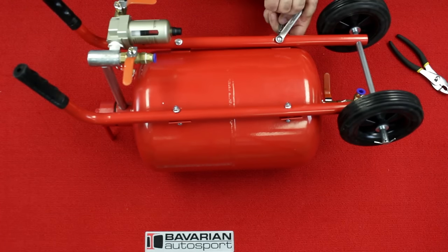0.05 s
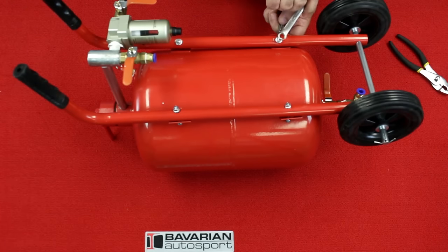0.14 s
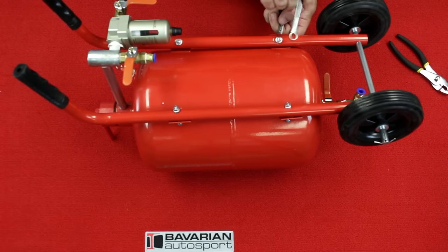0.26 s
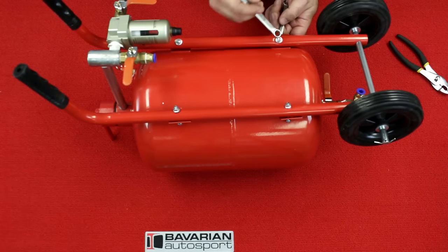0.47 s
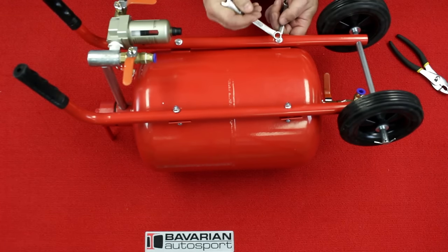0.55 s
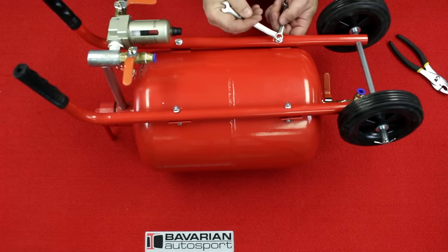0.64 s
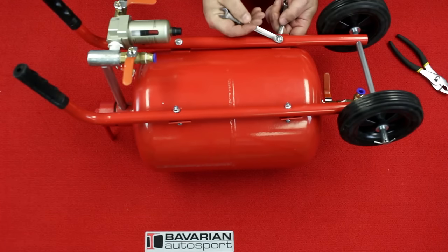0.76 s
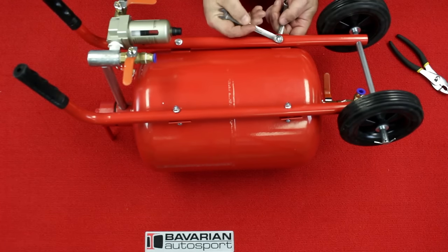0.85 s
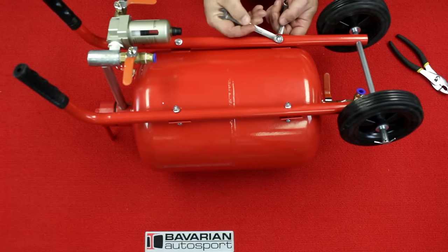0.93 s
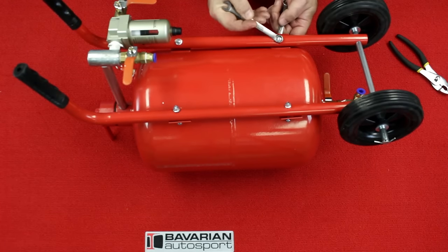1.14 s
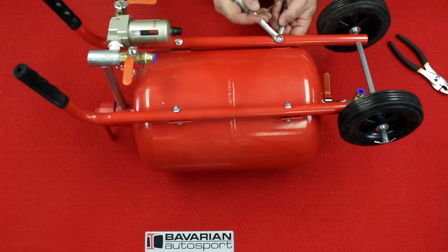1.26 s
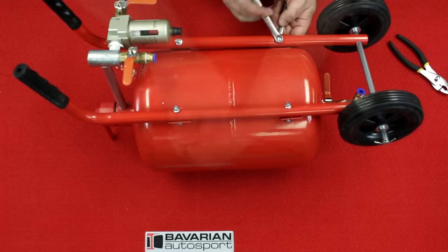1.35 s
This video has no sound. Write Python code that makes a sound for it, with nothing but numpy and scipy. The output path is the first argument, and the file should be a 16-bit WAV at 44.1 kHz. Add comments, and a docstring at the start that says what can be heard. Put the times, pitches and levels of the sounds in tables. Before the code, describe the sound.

Steel wrenches clink and clank against a nut and bolt on a metal frame.

```python
"""Two steel wrenches knock on a nut and bolt of a tubular steel frame that carries a small tank.
Each knock rings the frame (clank near 1 kHz, low tank hum) and the hand-damped wrenches (bright clink).
The jaws rub faintly between knocks; a hand bumps the frame once.
A small workshop adds a short tail, air noise and rumble."""
import sys
import numpy as np
from scipy import signal
from scipy.fft import rfft, irfft
from scipy.io import wavfile
from scipy.ndimage import uniform_filter1d

SR = 44100
rng = np.random.default_rng(int(sys.argv[2]) if len(sys.argv) > 2 else 0)


def wav_out(sig):
    """Save sig, one row per channel (or a flat mono array), as 16-bit PCM at SR to the path in sys.argv[1]."""
    wavfile.write(sys.argv[1], SR, np.round(np.clip(np.atleast_2d(sig).T, -1, 1) * 32767).astype(np.int16))


N = 61739
T = np.arange(N) / SR
BINS_HZ = np.maximum(np.arange(N // 2 + 1) * SR / N, 1)

# noise spectra: f/Hz, relative level/dB
AIR_COLOUR = [(41, -13.5), (70, -7.5), (166, -7.5), (199, -11), (451, -17), (606, -19), (1050, -20.5),
              (1470, -27), (2170, -29), (2540, -31.5), (2980, -31.5), (4480, -37.5), (16000, -41.5)]
RUMBLE_COLOUR = [(8, 2.5), (20, 1), (28, 2), (40, 0), (58, -9), (80, -20.5), (160, -59.5)]
RUB_COLOUR = [(300, -1), (1500, -9), (4000, -2.5), (7500, -4), (11000, -13.5), (16000, -11)]
BUMP_COLOUR = [(60, -25), (160, 5.5), (290, 5.5), (450, -7), (1500, -16), (6000, -29), (16000, -36)]
# rumble envelope: t/s, level/dB
RUMBLE_LEVELS = [(0.0, -66), (0.15, -53), (0.368, -60), (0.4, -52.5), (0.618, -67), (1.062, -58),
                 (1.242, -63), (1.308, -60), (1.4, -49)]
# knocks: t/s, frame level/dB, frame tilt/(dB/oct), favoured f/Hz, favour/dB,
# wrench level/dB, wrench tilt/(dB/oct), second wrench's share/(0-1), contact time/s
KNOCKS = [(0.1389, -50, -2.5, 860, 4.5, -70, 4, 0, 0.0024), (0.203, -51, 10, 930, 17, -70, 3, 0.2, 0.00094),
          (0.2064, -38, -0.5, 1557, 18.5, -44.5, -6.5, 0, 0.0013),
          (0.2166, -35.5, -1.5, 590, 5, -43.5, -1, 0.6, 0.0022),
          (0.2337, -24, 0.5, 966, 9.5, -39, 2, 0.3, 0.0011),
          (.2495, -32.5, 2.5, 1300, -4, -42, 0, 0.76, 0.0017),
          (0.2649, -70, 3, 990, 19, -50, -7.5, 0.8, .002), (.311, -50, 2, 904, 9.5, -83, -11, 0.4, .002),
          (0.7539, -46.5, 3.5, 1394, -14, -34, 1, 0, 0.0015),
          (0.773, -46, -4, 1410, 12, -43.5, -7.5, 0, 0.00023),
          (0.8073, -38.5, -6, 1733, 24, -31.5, 4.5, .06, 0.00073),
          (0.8172, -36, 4, 579, 17.5, -57, -6, 0.9, 0.0003),
          (0.8392, -38.5, 9.5, 1324, 7.5, -41.5, 0, 0.8, 0.00017),
          (0.8779, -52, -1.5, 1350, -4, -51, -5.5, 0.25, 0.00055),
          (0.8926, -25.5, -0.5, 1618, 10.5, -25.5, -0.5, 0.98, 0.0012),
          (0.927, -42, -2.5, 968, 22, -51, -8, 1, 0.0012),
          (0.959, -78, 10, 950, 7, -57, -3.5, 0.82, 0.0013),
          (1.0701, -45.5, -3.5, 1670, 7.5, -55, 2, 0.84, 0.00088),
          (1.086, -47.5, 2.5, 1345, 9, -57, -5.5, 0, 0.0015),
          (1.1484, -51, -3, 970, 7.5, -75, 2, 0.3, 0.00063),
          (1.211, -67, 1, 1350, 6, -60.5, -3, 0.97, 0.00091),
          (1.3168, -50.5, 0.5, 1010, 9, -69.5, 3, 0.23, 0.0017),
          (1.345, -72, -11, 1014, 23, -102, -6, .5, 0.0022)]
# spectra of dense, quickly damped modes: f/Hz, relative level/dB
FRAME_BODY = [(40, -74), (150, -31), (290, -22.5), (340, -4.5), (450, -16), (580, -3.5), (740, -13),
              (860, 3.5), (1000, 0.5), (1120, -12.5), (1320, 2.5), (1480, -8.5), (1630, -6), (1850, -13),
              (2600, -16), (5000, -40.5), (16000, -70)]
WRENCH_BODY = [(50, -45), (300, -14.5), (900, -0.5), (2000, -1.5), (3500, 5), (6500, 9), (9000, 4),
               (11500, -1.5), (14500, -15), (16000, -19)]
# clear modes of the frame (tank, then tubes) and each wrench: f/Hz
FRAME_HZ = [330, 345, 388, 431, 603, 858, 926, 973, 1004, 1265, 1330, 1394, 1558, 1645, 1906]
WRENCH1_HZ = [2132, 2328, 2493, 2852, 4480, 4646, 5006, 6237, 6400, 7386, 10410, 10800, 11400, 15100]
WRENCH2_HZ = [2455, 2720, 3200, 3284, 3803, 4721, 5864, 6158, 6627, 7090, 8420, 10600, 12100, 13250]
# the same modes: relative level/dB, t60/s before the MAX_Q cap
TANK_MODES = [(-29, .9), (-27.5, 1.3), (-28, 1.1), (-21.5, .55)]
TUBE_MODES = [(-17, 0.153), (-4, 0.17), (-17, 0.066), (-4, 0.14), (-13.5, 0.19), (-10, 0.17), (-10.5, 0.24),
              (-11.5, 0.33), (-9.5, 0.21), (-4.5, 0.049), (-16.5, .22)]
WRENCH1_MODES = [(-5, 0.16), (-1.5, 0.088), (4.5, 0.089), (-10, 0.24), (-1.5, 0.1), (-12, 0.11),
                 (-7.5, 0.22), (-2, 0.059), (5, 0.043), (-6.5, 0.092), (0, 0.026), (-20, 0.027),
                 (-24, 0.026), (-36, .04)]
WRENCH2_MODES = [(-19.5, 0.12), (-9, 0.047), (4.5, 0.044), (-16, 0.13), (4, 0.044), (-4.5, 0.084),
                 (-0.5, .09), (9, 0.05), (-22, 0.068), (-33, 0.039), (3, 0.05), (-5, 0.018), (-22, .025),
                 (2, 0.025)]
# jaw rubs: centre t/s, half width/s, peak level/dB
RUBS = [(0.47, 0.1, -75.5), (1.085, .05, -70.5), (1.247, 0.091, -75)]
# reverberation bands: f/Hz, level/dB, t60/s
ROOM_BANDS = [(348, -7, 0.59), (897, -27, 0.63), (1920, -16.5, 0.79), (3580, -12.5, 0.4), (6550, -15, 0.24),
              (13100, -25, 0.5)]

SCATTER_DB, MAX_Q = 1.5, 360


def undb(db):
    """Decibels to gain."""
    return 10 ** (np.asarray(db) / 20)


def unit(x):
    """Scale to rms 1."""
    return x / np.sqrt(np.mean(x ** 2))


def fade(t, t60_s):
    """Exponential decay, 60 dB down at t60_s."""
    return np.exp(-np.log(1000) * t / t60_s)


def noise(colour):
    """Random-phase noise of the given spectrum, rms 1."""
    hz, db = np.array(colour).T
    gain = undb(np.interp(np.log2(BINS_HZ), np.log2(hz), db))
    return unit(irfft(gain * np.exp(2j * np.pi * rng.random(len(gain))), N))


def background(air_db=-66):
    """Steady air noise; low rumble that swells and sinks."""
    at_s, db = np.array(RUMBLE_LEVELS).T
    return undb(air_db) * noise(AIR_COLOUR) + undb(np.interp(T, at_s, db)) * noise(RUMBLE_COLOUR)


def ring(modes_hz, modes, t, shape_db):
    """Clear decaying modes, initial rms 1; each blow splits its energy a little differently."""
    hz, (db, t60_s) = np.array(modes_hz), np.array(modes).T
    gains = undb(db + shape_db(hz) + SCATTER_DB * rng.standard_normal(len(hz)))
    gains /= np.sqrt(np.sum(gains ** 2) / 2)
    t60_s = np.minimum(t60_s, np.log(1000) / np.pi * MAX_Q / hz)  # grip damps high modes soonest
    out = np.zeros(len(t))
    for f_hz, gain, decay_s, phase in zip(hz, gains, t60_s, rng.random(len(hz))):
        age = t[:int(decay_s * SR * 2)]
        out[:len(age)] += gain * fade(age, decay_s) * np.sin(2 * np.pi * (f_hz * age + phase))
    return out


def damped(colour, t, shape_db, t60_s, size=16384):
    """Dense modes dying together: a flattened noise burst through the part's causal response."""
    bins_hz = np.maximum(np.arange(size // 2 + 1) * SR / size, 20)
    hz, db = np.array(colour).T
    gain = undb(np.interp(np.log(bins_hz), np.log(hz), db) + shape_db(bins_hz))
    cepstrum = irfft(np.log(gain))
    response = np.exp(rfft(2 * cepstrum[:size // 2], size))  # minimum phase
    decay = fade(T[:size], t60_s)
    burst = rfft(rng.standard_normal(size) * decay)
    burst /= np.sqrt(uniform_filter1d(np.abs(burst) ** 2, size=41))
    sound = unit(irfft(burst * response)) * np.sqrt(np.mean(decay ** 2))
    return np.pad(sound[:size // 2], (0, N))[:len(t)]


def frame(t, tilt_db_oct, favoured_hz, favour_db, width_oct=0.11):
    """Clank of tubes and tank: hardness tilts the spectrum, the contact point lifts or cuts one band."""
    def contact_db(hz):
        octave = np.log2(hz / favoured_hz)
        return tilt_db_oct * octave + favour_db * np.exp(-(octave / width_oct) ** 2)
    clear = ring(FRAME_HZ, TANK_MODES + TUBE_MODES, t, contact_db)
    body = damped(FRAME_BODY, t, contact_db, t60_s=0.094)
    punch = damped(FRAME_BODY, t, contact_db, t60_s=0.028)  # before the knock spreads
    return undb(-7) * clear + undb(-4.5) * body + undb(-2) * punch


def skirts(modes_hz, hz, relative_width=0.03):
    """Power of broad resonances centred on the modes."""
    return sum(1 / (1 + (2 * (hz / f - 1) / relative_width) ** 2) ** 2 for f in modes_hz)


def wrenches(t, tilt_db_oct, share, valley_db=-4.5, crack_db_oct=2.5):
    """Steel-on-steel crack and short ring of both wrenches; damped modes cluster at the clear ones."""
    def contact_db(hz):
        return tilt_db_oct * np.log2(hz)
    def body_db(hz):
        clusters = (1 - share) * skirts(WRENCH1_HZ, hz) + share * skirts(WRENCH2_HZ, hz)
        return contact_db(hz) + 10 * np.log10(clusters + undb(valley_db) ** 2)
    def crack_db(hz):
        return body_db(hz) + crack_db_oct * np.log2(hz)
    first = np.sqrt(1 - share) * ring(WRENCH1_HZ, WRENCH1_MODES, t, contact_db)
    second = np.sqrt(share) * ring(WRENCH2_HZ, WRENCH2_MODES, t, contact_db)
    body = damped(WRENCH_BODY, t, body_db, t60_s=0.08)
    crack = damped(WRENCH_BODY, t, crack_db, t60_s=0.013)
    return undb(-4) * (first + second) + undb(-6.5) * body + undb(-0.5) * crack


def knocks(frame_lag_s=0.0011):
    """Each knock builds over its contact time; the heavy frame rises more slowly than the wrenches."""
    out = np.zeros(N)
    for at_s, frame_db, *frame_contact, wrench_db, tilt_db_oct, share, contact_s in KNOCKS:
        start = int(at_s * SR)
        t = T[:N - start]
        frame_rise = np.minimum(t / (contact_s + frame_lag_s), 1)
        wrench_rise = np.minimum(t / contact_s, 1)
        out[start:] += undb(frame_db) * frame_rise * frame(t, *frame_contact)
        out[start:] += undb(wrench_db) * wrench_rise * wrenches(t, tilt_db_oct, share)
    return out


def workshop(direct, build_s=0.0088):
    """Direct sound plus a diffuse tail that builds fast and dies sooner in the treble."""
    white = rfft(rng.standard_normal(N))
    log_centres = np.log([hz for hz, _, _ in ROOM_BANDS])
    tail = np.zeros(N)
    for selector, (_, db, t60_s) in zip(np.eye(len(ROOM_BANDS)), ROOM_BANDS):
        band = irfft(white * np.interp(np.log(BINS_HZ), log_centres, selector), N)
        envelope = fade(T, t60_s) * (1 - np.exp(-(T / build_s) ** 2))
        tail += undb(db) * band * envelope / np.linalg.norm(envelope)
    return direct + signal.fftconvolve(direct, tail)[:N]


def rubs():
    """Faint swells of hiss as the jaws slide on the nut."""
    swells = sum(undb(db) * np.exp(-((T - at_s) / half_s) ** 2) for at_s, half_s, db in RUBS)
    return swells * noise(RUB_COLOUR)


def bump(at_s=0.499, level_db=-48, rise_s=0.006, t60_s=0.051):
    """Soft, dull bump of a hand on the frame."""
    t = np.maximum(T - at_s, 0)
    return undb(level_db) * noise(BUMP_COLOUR) * np.minimum(t / rise_s, 1) * fade(t, t60_s)


def scene():
    """Knocks, rubs and bump in the workshop, over air noise and rumble; mono."""
    return (workshop(knocks() + rubs() + bump()) + background())[None]


def record(dry):
    """Elliptic low-pass at 16.1 kHz."""
    return signal.sosfilt(signal.ellip(8, 0.2, 70, 16100, fs=SR, output="sos"), dry)


dry = scene()
out = record(dry)
wav_out(out)
```